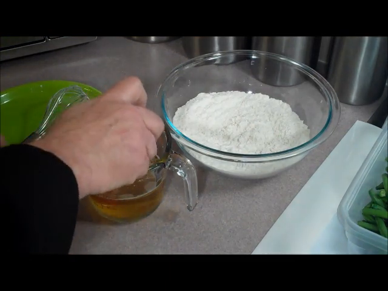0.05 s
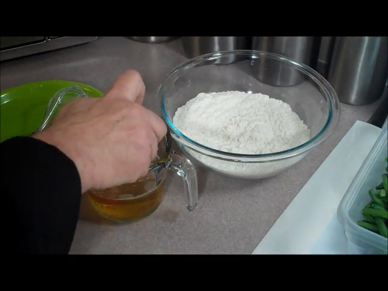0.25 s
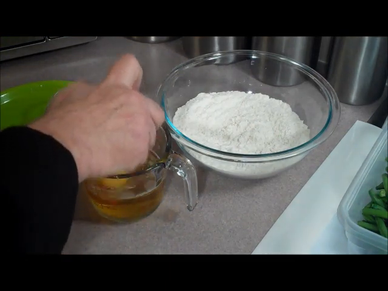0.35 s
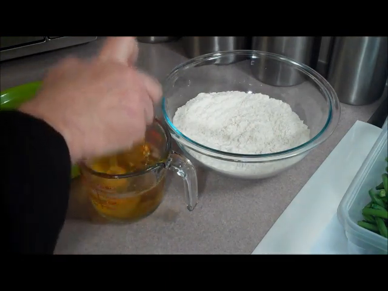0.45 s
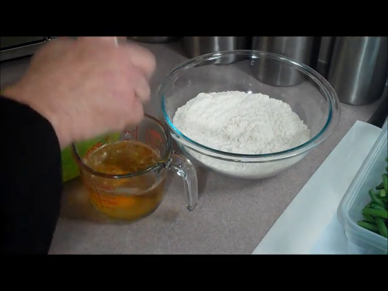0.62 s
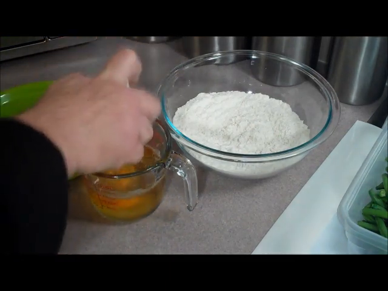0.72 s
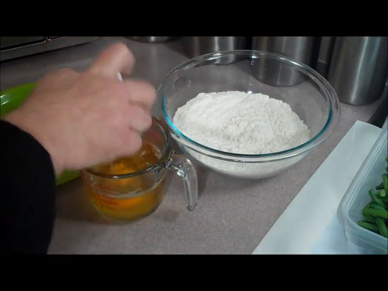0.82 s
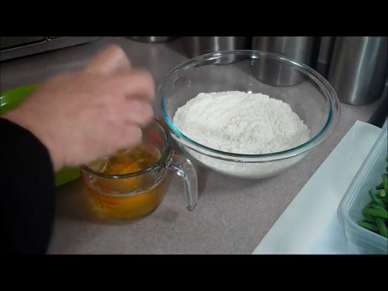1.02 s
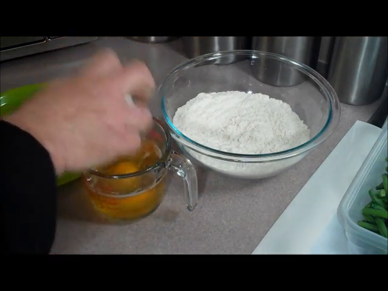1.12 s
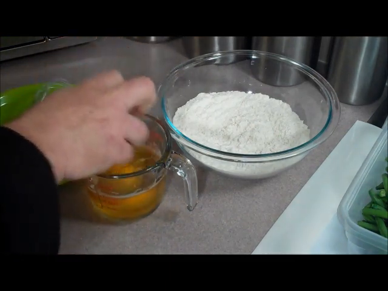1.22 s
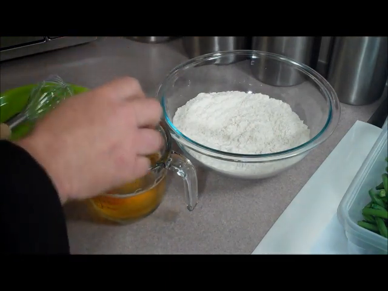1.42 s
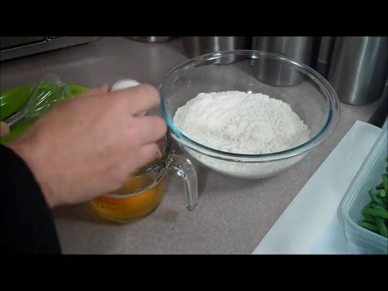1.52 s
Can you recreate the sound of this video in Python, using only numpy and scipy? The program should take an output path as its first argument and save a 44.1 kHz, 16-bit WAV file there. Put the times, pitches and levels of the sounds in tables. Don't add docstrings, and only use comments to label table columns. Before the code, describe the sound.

An eggshell splits with sharp, brittle cracks over a glass cup, the yolk drops with a small rising bubble, then empty halves tick, rub and knock hollowly. Small kitchen, close stereo microphone, faint room tone.

```python
import sys
import numpy as np
from scipy import signal
from scipy.fft import rfft, irfft
from scipy.io import wavfile
from scipy.ndimage import uniform_filter1d

SR = 44100
rng = np.random.default_rng(int(sys.argv[2]) if len(sys.argv) > 2 else 0)


def transcribe(signal):
    frames = np.atleast_2d(signal).T
    limited = np.clip(frames, -1, 1)
    pcm = np.round(limited * 32767).astype(np.int16)
    wavfile.write(sys.argv[1], SR, pcm)


def ratio(d):
    e = np.asarray(d, float) / 20
    return 10 ** e


N = 68355

# frequency in Hz, density in dB per Hz.
AIR_SPECTRUM = [(15, 9), (64, -2.5), (445, -5), (1460, -6.5), (2200, -10.5), (3500, -4), (11000, -18),
                (15000, -54)]
# frequency in Hz, left-right likeness 0 to 1.
AIR_LIKENESS = [(30, 0.71), (150, 0.2), (300, 0.39), (2000, 0.26), (5000, 0.25), (12000, 0.31)]
AIR_DB = -65.5

# start in seconds, frequency in Hz, level in dB, T60 in seconds.
BUMPS = [
    (0.341, 123, -61, .12),
    (1.291, 126, -62, 0.15),
    (1.301, 318, -55.5, 0.082),
    (1.317, 330, -53, 0.066),
    (1.326, 440, -46.5, 0.039),
    (1.329, 215, -55.5, 0.067),
    (0, 125, -57.5, 0.063),
    (.01, 342, -58, 0.083),
]

# time in seconds, level in dB.
RUB_LEVEL = [(.0, -58.5), (0.091, -78), (.5, -71.5), (.66, -70.5), (.78, -66.5), (.85, -68), (.89, -58.5),
             (1.007, -59.5), (1.04, -89), (1.1, -65), (1.272, -67.5), (1.308, -55), (1.35, -58.5),
             (1.438, -58), (1.469, -72.5), (1.55, -66.5)]
# frequency in Hz, density in dB per Hz.
RUB_SPECTRUM = [(120, -16), (850, -5.5), (1400, 1), (2400, -3), (3300, -3.5), (4900, -9.5), (7400, -17.5),
                (13000, -62)]
SLIPS_PER_S, SLIP_SPREAD_DB = 3000, 2.0

# time in seconds, frequency in Hz, level in dB.
BUBBLE = [
    (.574, 540, -53.5),
    (0.583, 479, -54),
    (0.597, 470.5, -56.5),
    (0.606, 488, -53),
    (0.618, 669, -51),
    (0.621, 794, -59),
    (0.63, 920, -40.5),
    (0.631, 1006, -46.5),
    (.655, 1157, -57),
]
# start in seconds, frequency in Hz, end frequency in Hz,
# level in dB, T60 in seconds.
BLOBS = [
    (0.574, 950, 915, -45, 0.024),
    (0.617, 462, 464.5, -53, 0.12),
    (.614, 1780, 1760, -48.5, 0.022),
    (.623, 1716, 1700, -46, 0.046),
    (0.633, 1133, 1545, -41.5, 0.051),
    (0.661, 1000, 940, -48.5, 0.059),
]

# start in seconds, ring in dB, crack in dB, treble in dB, T60 in seconds.
BLOWS = [
    (0.2045, -9, -25, -33, 0.035),
    (0.2659, -19, -29.5, -28.5, 0.025),
    (1.138, -24, -30, -30, 0.022),
    (1.2918, -31.5, -33.5, -49, 0.033),
    (1.1478, -32, -68, -55, 0.014),
]
# frequency in Hz, level re blow in dB, T60 in seconds.
BREAK_MODES = [(3830, 6, 0.0048), (2084, -8.5, 0.016), (6480, -3, .004)]
SNAP_MODES = [(3910, 9.5, 0.013), (3700, -4, 0.024), (885, -14.5, 0.049), (934, -24.5, 0.099),
              (1040, -32, 0.16), (1700, -5.5, 0.012), (5200, -20, 0.043), (2713, -26.5, 0.019)]
KNOCK_MODES = [(1420, 2, 0.043), (1527, 2, 0.024), (1047, -6, 0.048), (1101, -12, 0.082), (1260, -7, 0.04),
               (930, -21, 0.15), (1062, -28, .18), (1425, -25, 0.23), (3900, -9, 0.019), (2643, -1, 0.018),
               (4600, 3, 0.0055), (6160, -8.5, 0.019), (600, -21.5, 0.059), (2050, -7, 0.035)]
NEST_MODES = [(3240, 4.5, 0.015), (2270, -9.5, 0.024), (4800, 7, 0.0067), (1168, -11.5, 0.04),
              (554, -17, 0.037)]
BOUNCE_MODES = [(1420, -4, 0.019), (1247, -5, 0.041)]
WOBBLE_DB = 4.0

# start in seconds, ring in dB, ring frequency in Hz, treble in dB, T60 in seconds.
SPLIT = [(0.0, -28, 2420, -54, 0.088), (.0042, -41, 2530, -43, 0.05), (0.028, -35.5, 3070, -51.5, 0.063),
         (.14, -49, 6270, -51, 0.044), (.173, -42, 3760, -48.5, 0.022), (.18, -39, 4300, -45, 0.038),
         (0.181, -38.5, 910, -46, 0.023), (.1805, -47.5, 560, -70, 0.022), (.181, -38.5, 2090, -68, .02),
         (.193, -31.5, 3460, -47, 0.0067), (0.2002, -28.5, 3620, -34.5, 0.044),
         (.2078, -21.5, 2047, -28, 0.019), (0.2125, -43, 1890, -45, 0.034), (0.223, -37, 2400, -44, 0.021),
         (0.226, -36, 2370, -42, 0.024), (0.2321, -29, 2360, -39, 0.022),
         (0.2368, -20.5, 2097, -32.5, 0.052), (0.2362, -24.5, 3900, -53, 0.014),
         (.242, -42, 2340, -30.5, 0.019), (0.2483, -28, 1910, -34.5, 0.028), (.255, -48, 2060, -48, 0.02),
         (0.2822, -26.5, 3910, -30, 0.017), (0.321, -38.5, 1070, -65, 0.05), (.325, -41, 1570, -57, 0.05),
         (.356, -44, 980, -66, 0.073)]
# start in seconds, ring in dB, ring frequency in Hz, treble in dB.
TICKS = [(0.436, -49, 3920, -47.5), (0.45, -44, 4600, -63), (0.485, -47.5, 1540, -78),
         (.486, -46, 2210, -76), (.503, -47.5, 2040, -75), (.452, -58, 3320, -64), (0.502, -49, 3200, -49),
         (0.575, -48.5, 3650, -56.5), (.595, -50, 3100, -85), (0.614, -46, 1790, -87),
         (0.676, -48, 3900, -73), (0.701, -57, 1070, -73), (0.71, -41.5, 3830, -83),
         (0.675, -32.5, 1500, -60), (0.71, -31.5, 1500, -48), (0.753, -46.5, 1690, -93),
         (0.868, -40, 1360, -49.5), (0.872, -36.5, 1640, -53.5), (0.894, -39, 2810, -64),
         (0.901, -41.5, 3100, -54.5), (0.942, -43.5, 1700, -45.5), (.943, -45, 6630, -64),
         (.995, -44, 2020, -62), (1.0042, -40, 5170, -56), (1.024, -55, 7700, -58.5),
         (1.004, -40, 1530, -58), (1.069, -49, 1800, -60), (1.083, -48.5, 2010, -52.5),
         (1.107, -50, 3700, -51.5)]
# start in seconds, ring in dB, ring frequency in Hz, treble in dB.
NEST = [(1.23, -35, 1460, -50.5), (1.232, -38.5, 2800, -56), (1.231, -41.5, 2020, -70),
        (1.263, -42, 1620, -70), (1.283, -51, 1920, -65), (1.28, -40, 3850, -44.5),
        (1.298, -31.5, 3060, -72), (1.306, -37.5, 2900, -74), (1.314, -42, 1230, -68),
        (1.318, -37.5, 2050, -77), (1.332, -39, 1240, -71), (1.327, -43, 1420, -79),
        (1.366, -41, 2710, -54), (1.378, -44, 1800, -55.5), (1.385, -38, 1910, -49),
        (1.413, -68, 1030, -43), (1.4225, -38, 1080, -48), (1.423, -41, 3640, -53), (1.453, -43, 1130, -75),
        (1.443, -38, 1840, -75), (1.527, -47, 5170, -58.5)]
TICK_T60_S, NEST_T60_S = 0.029, 0.032
# frequency in Hz, density in dB per Hz.
SHELL_SPECTRUM = [(250, -44), (550, -10.5), (1400, -25), (2050, -0.5), (2700, -4), (3900, -4.5), (5500, -8),
                  (10000, -44)]
# frequency in Hz, density in dB per Hz.
TREBLE_SPECTRUM = [(2500, -15.5), (5000, 3), (7000, 4), (10000, 2), (12500, -9), (14200, -22), (15300, -70)]
# frequency in Hz, left-right likeness 0 to 1.
CRACK_LIKENESS = [(2000, 0.94), (5000, 0.97), (9000, 0.11)]
CRACK_DB, TREBLE_DB, RING_DB, RAGGED_DB = -14, -0.5, -0.5, 2.5
RISE_S, RING_T60_S = 0.00058, 0.012
CUP_HZ, CUP_DB, CUP_T60_S = 3840, -19, 0.028

# frequency in Hz, T60 in seconds.
ROOM_T60 = [(300, 0.26), (1000, 0.39), (3000, 0.25), (8000, 0.28), (14000, 0.24)]
# frequency in Hz, left-right likeness 0 to 1.
ROOM_LIKENESS = [(300, 1), (2000, 0.56), (5000, 0.057), (12000, 0.39)]
# delay in seconds, level in dB.
ECHOES = [
    (.0021, -18),
    (.0045, -23.5),
    (.0098, -18.5),
]
ROOM_DB, TONAL_SEND_DB = -7, -4.5

# frequency in Hz, left minus right in dB.
PORT_BALANCE = [(100, 1), (500, 3), (2000, 3), (6000, 2), (13000, -0.9)]
# frequency in Hz, left lead in radians.
PORT_LEAD = [(2000, 0.024), (5000, 0.96), (8000, 1.3), (13000, 2.2)]


def evened(x):
    return x / np.sqrt(np.mean(x ** 2) + 1e-20)


def read(points, hz):
    f, value = np.transpose(points)
    return np.interp(np.log(hz + 1), np.log(f + 1), value)


def add(mix, start_s, sound):
    part = mix[..., max(round(start_s * SR), 0):][..., :sound.shape[-1]]
    part += sound[..., :part.shape[-1]]


def colour(x, points):
    n = x.shape[-1]
    gain = ratio(read(points, np.fft.rfftfreq(n, 1 / SR)))
    return irfft(rfft(x) * gain, n)


def dying(t, t60_s, rise_s=RISE_S):
    return (1 - np.exp(-t / rise_s)) * ratio(-60 * t / max(t60_s, 0.004))


def sweep(hz):
    return np.sin(2 * np.pi * np.cumsum(hz) / SR)


def pair(a, b, likeness):
    same = np.clip(read(likeness, np.fft.rfftfreq(len(a), 1 / SR)), 0, 1)
    right = same * rfft(a) + np.sqrt(1 - same ** 2) * rfft(b)
    return np.array([a, irfft(right, len(a))])


def air():
    a, b, c = rng.standard_normal((3, N))
    lumps = ratio(1.0 * evened(uniform_filter1d(c, size=3000)))
    return ratio(AIR_DB) * lumps * evened(colour(pair(a, b, AIR_LIKENESS), AIR_SPECTRUM))


def kitchen(x):
    length, gap = SR // 2, 20
    slots = np.arange(200, length - gap, gap)
    at = slots + rng.integers(0, gap, (2, len(slots)))
    taps = np.zeros((2, length))
    np.put_along_axis(taps, at, rng.choice([-1.0, 1.0], at.shape), 1)
    hz, t, z = signal.stft(pair(*taps, ROOM_LIKENESS), SR, nperseg=256)
    decay = ratio(-60 * t / read(ROOM_T60, hz)[:, None])
    tail = signal.istft(z * decay, SR, nperseg=256)[1]
    tail = ratio(ROOM_DB) * tail / np.linalg.norm(tail[0])
    for k, (delay_s, db) in enumerate(ECHOES):
        sign, i = (-1) ** k, round(delay_s * SR)
        tail[[0, 1], [i, i + 2 * sign]] += sign * ratio(db)
    return signal.fftconvolve(x[None], tail, axes=1)[:, :N]


def bumps():
    out, t = np.zeros(N), np.arange(6000) / SR
    for start_s, hz, db, t60_s in BUMPS:
        add(out, start_s, ratio(db) * dying(t, t60_s, 0.0063) * np.sin(2 * np.pi * hz * t))
    return out


def rub():
    size = ratio(SLIP_SPREAD_DB * np.minimum(rng.exponential(1, N), 4))
    slips = size * (rng.random(N) < SLIPS_PER_S / SR)
    grain = rng.standard_normal(200) * np.exp(-np.arange(200) / 13.8)
    s, db = np.transpose(RUB_LEVEL)
    level = ratio(np.interp(np.arange(N) / SR, s, db))
    noise = signal.oaconvolve(slips * rng.choice([-1, 1], N), grain)[:N]
    return level * evened(colour(noise, RUB_SPECTRUM))


def yolk():
    out = np.zeros(N)
    s, hz, db = np.transpose(BUBBLE)
    t = np.arange(s[0], s[-1], 1 / SR)
    edge = np.clip(np.minimum(t - s[0], s[-1] - t) / 0.0014, 0, 1)
    add(out, s[0], edge * 1.8 * ratio(np.interp(t, s, db)) * sweep(np.interp(t, s, hz)))
    t = np.arange(6000) / SR
    for start_s, start_hz, end_hz, level_db, t60_s in BLOBS:
        glide_hz = start_hz + (end_hz - start_hz) * (1 - np.exp(-t / 0.0118))
        add(out, start_s, ratio(level_db) * dying(t, t60_s, 0.001) * sweep(glide_hz))
    return out


def rings():
    out, t = np.zeros(N), np.arange(8192) / SR
    mode_sets = (BREAK_MODES, SNAP_MODES, KNOCK_MODES, NEST_MODES, BOUNCE_MODES)
    for (start_s, ring_db, *_), modes in zip(BLOWS, mode_sets):
        for hz, mode_db, t60_s in modes:
            drift = uniform_filter1d(rng.standard_normal(len(t)), size=200)
            drift = evened(uniform_filter1d(drift, size=200))
            wobble_db = WOBBLE_DB * np.minimum(t / 0.02, 1) * drift
            level = ratio(ring_db + mode_db + wobble_db)
            add(out, start_s, level * dying(t, t60_s, 0.00083) * np.sin(2 * np.pi * hz * t))
    return colour(out, [(200, -24), (600, 0)])


def crack(crack_db, treble_db, t60_s, ring_db=-120, hz=2000):
    t, z = np.arange(4096) / SR, rng.standard_normal((3, 4096))
    ragged = pair(z[0], z[1], CRACK_LIKENESS) * ratio(RAGGED_DB * evened(uniform_filter1d(z[2], size=24)))
    rim = ratio(CUP_DB) * np.sin(2 * np.pi * CUP_HZ * t) * dying(t, CUP_T60_S)
    piece = np.sin(2 * np.pi * hz * t) * dying(t, RING_T60_S)
    body = ratio(crack_db) * evened(colour(ragged, SHELL_SPECTRUM)) * dying(t, t60_s)
    spit = ratio(treble_db) * evened(colour(ragged, TREBLE_SPECTRUM)) * dying(t, 1.11 * t60_s)
    return ratio(ring_db) * (piece + rim) + body + spit


def shell():
    out = np.zeros((2, N))
    ticks = [(*row, TICK_T60_S) for row in TICKS]
    nest = [(*row, NEST_T60_S) for row in NEST]
    for start_s, db, hz, treble_db, t60_s in list(SPLIT) + ticks + nest:
        burst = crack(db + CRACK_DB, treble_db + TREBLE_DB, t60_s, db + RING_DB, hz)
        add(out, start_s - 0.0003, burst)
    for start_s, _, crack_db, treble_db, t60_s in BLOWS:
        add(out, start_s, crack(crack_db, treble_db, t60_s))
    return colour(out, [(150, -27.5), (450, -1.0)])


def scene():
    noisy = shell() + rub()
    tonal = rings() + yolk() + bumps()
    room = kitchen(noisy.mean(0) + ratio(TONAL_SEND_DB) * tonal)
    return noisy + tonal + room + air()


def band_limit(x):
    return signal.sosfilt(signal.butter(12, 15190, fs=SR, output="sos"), x)


def record(dry):
    hz, side = np.fft.rfftfreq(N, 1 / SR), np.array([[0.5], [-0.5]])
    ports = ratio(side * read(PORT_BALANCE, hz)) * np.exp(1j * side * read(PORT_LEAD, hz))
    mix = irfft(rfft(dry) * ports, N)
    return band_limit(mix)


dry = scene()
out = record(dry)
transcribe(out)
```